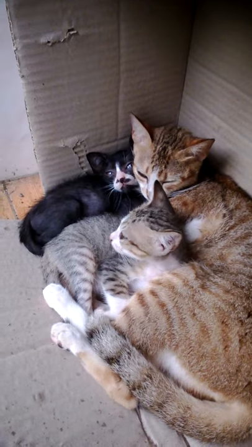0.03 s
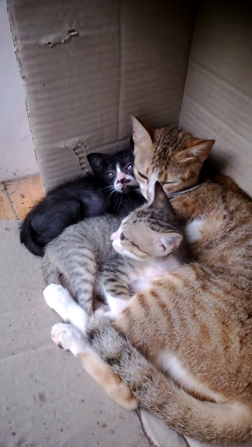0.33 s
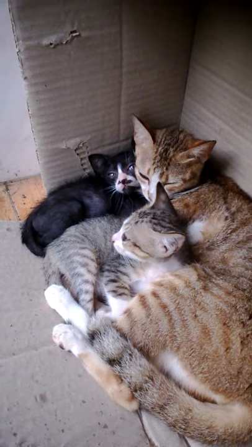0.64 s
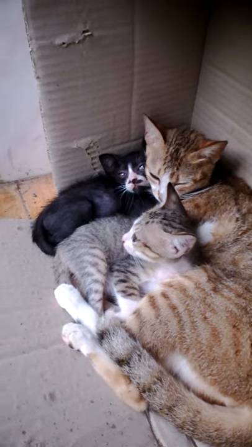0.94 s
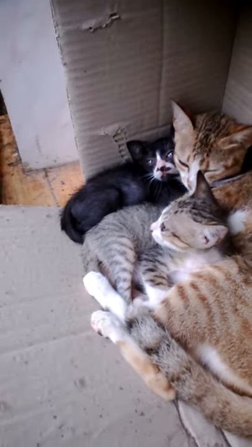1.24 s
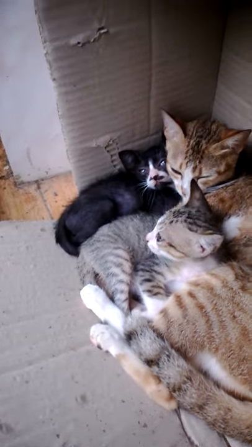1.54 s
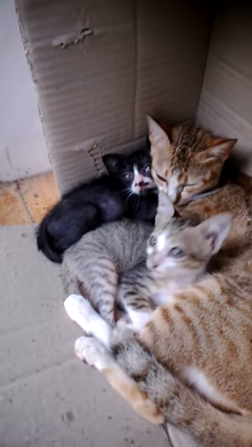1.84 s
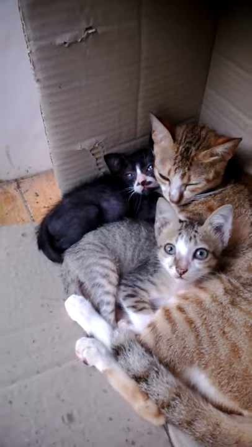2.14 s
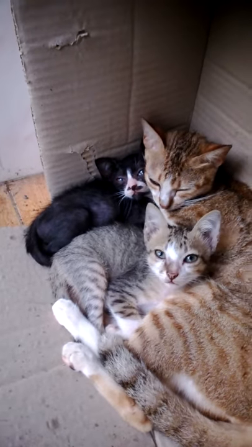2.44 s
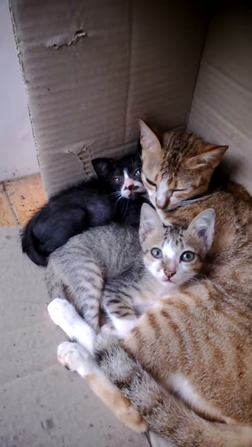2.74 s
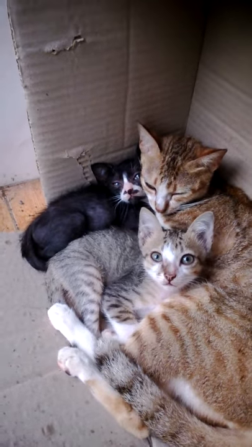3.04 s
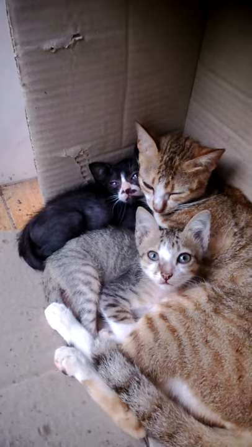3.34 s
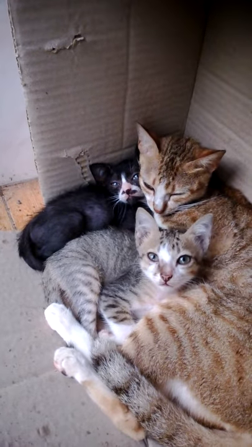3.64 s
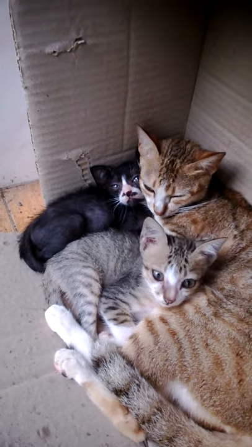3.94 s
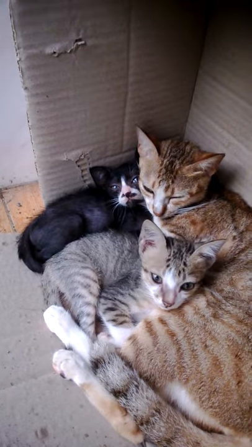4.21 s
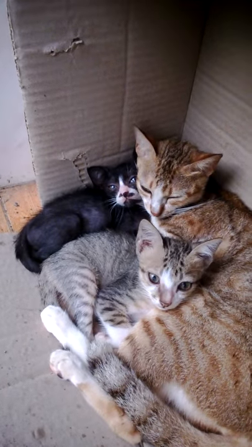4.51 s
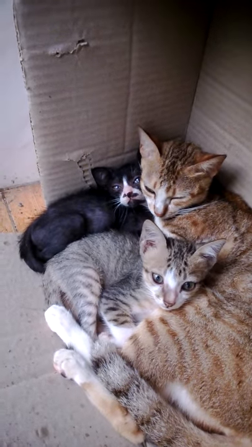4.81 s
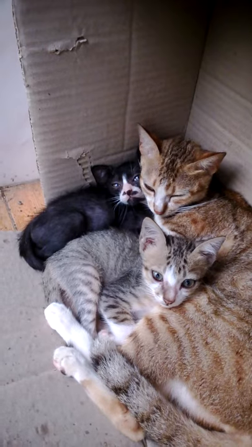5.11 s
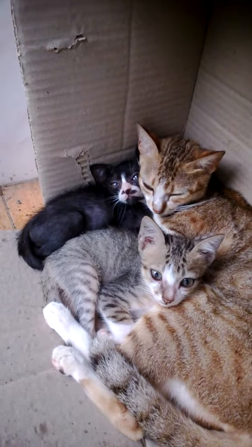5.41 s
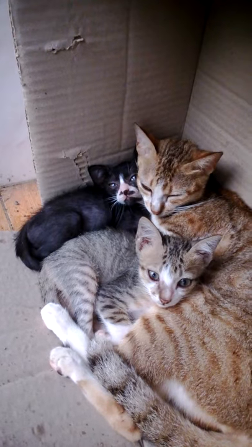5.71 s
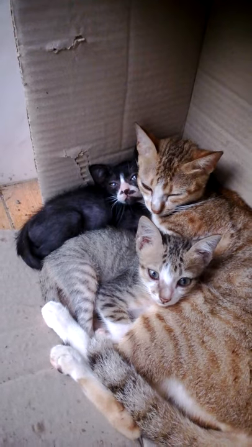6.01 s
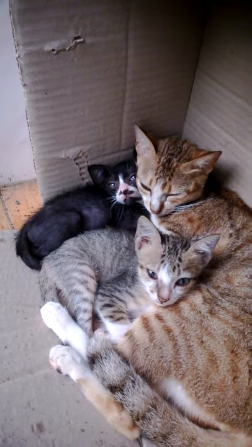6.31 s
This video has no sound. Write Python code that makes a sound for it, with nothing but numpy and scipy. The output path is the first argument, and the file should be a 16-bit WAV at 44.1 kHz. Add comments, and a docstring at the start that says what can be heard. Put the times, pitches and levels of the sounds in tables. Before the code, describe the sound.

Steady rain falls with a constant hiss and fine patter, heard from inside a home. Close drips tick and ring briefly off nearby walls, thickest at first, while small splashes of run-off and dull knocks of heavy drops come now and then. An engine idling outside adds a low, throbbing rumble. A faint far tone comes in short spells later, and a last burst of splashes lands near the end.

```python
"""Steady rain heard from inside a home, over the low rumble of an engine idling somewhere outside.
From the start, far drops merge into wash and hiss, nearer ones patter, and the nearest drips tick and
ring off close walls, thickest in the first two seconds. Run-off splashes and dull knocks of heavy drops
come now and then, the splashes bunching around 2.5-3 s. A faint far tone, glimpsed at the opening,
returns in spells from 4.4 s, and a last burst of run-off lands just after 6 s."""
import sys
import numpy as np
from scipy import signal
from scipy.fft import rfft, irfft
from scipy.io import wavfile
from scipy.ndimage import uniform_filter1d

SR = 44100
rng = np.random.default_rng(int(sys.argv[2]) if len(sys.argv) > 2 else 0)


def wrap_up_sound(samples):
    """Save the sound to the file named by the first command line argument, as 16-bit audio."""
    columns = np.atleast_2d(samples).T
    # keep every value between -1 and 1, then stretch to whole-number steps
    tamed = np.clip(columns, -1, 1)
    steps = np.round(tamed * 32767).astype(np.int16)
    wavfile.write(sys.argv[1], SR, steps)


N = 289396

# Fader ride of the rain on the ground. Each row: time in seconds, gain in dB.
RAIN_RIDE = [(0, 0.5), (1.1, 0.3), (2.2, -0.5), (2.55, 0.6), (3.2, 0.25), (4.05, -1), (4.45, -0.3),
             (5.3, -0.4), (6.3, -0.1), (6.56, 1.5)]
# Fader ride of the top hiss. Each row: time in seconds, level in dB before its boost.
TOP_HISS_RIDE = [(0, -64), (.07, -71), (.14, -76), (.24, -71), (.27, -74), (.46, -75), (.66, -76),
                 (.75, -59), (.89, -80), (1.15, -69), (1.33, -70), (1.44, -76), (1.5, -67), (1.68, -76),
                 (1.77, -63), (1.88, -77), (1.97, -63), (2.08, -71), (2.14, -66), (2.23, -83), (2.26, -66),
                 (2.32, -71), (2.5, -59), (2.56, -74), (2.65, -63), (2.7, -71), (2.83, -63), (2.9, -73),
                 (2.96, -65), (3.01, -76), (3.14, -66), (3.23, -75), (3.27, -60), (3.36, -70), (3.6, -66),
                 (3.76, -69), (3.84, -76), (4.02, -67), (4.05, -74), (4.11, -63), (4.29, -72), (4.33, -64),
                 (4.57, -65), (4.71, -76), (4.75, -71), (5.17, -66), (5.32, -76), (5.37, -64), (5.7, -69),
                 (5.72, -65), (5.75, -76), (5.94, -66), (6.01, -76), (6.1, -69), (6.17, -73), (6.23, -61),
                 (6.39, -68), (6.45, -63), (6.56, -68)]
# The nearest drips. Each row: start in seconds, ring peak in dB, pitch in Hz, ring decay in seconds,
# tick in dB relative to the ring.
DRIP_CUES = [(0.0927, -31, 2690, 0.0013, -12), (.198, -26.5, 2500, .004, -16),
             (.2285, -23, 2560, 0.0014, -7.5), (.3047, -36, 2620, .0015, -5),
             (.3332, -26.5, 2520, 0.0026, -10), (.462, -28.5, 2330, .0013, -8),
             (.555, -26.5, 2630, 0.0019, -11), (.5756, -36, 2460, .001, -1),
             (.6666, -27.5, 2460, .0035, -13), (0.6845, -27, 2580, .0041, -15),
             (0.7314, -32, 2360, .0022, -7), (.8127, -26, 2455, .003, -20), (.8245, -27, 2680, .002, -10),
             (0.8277, -28, 2600, .0026, -16), (0.956, -29.5, 2460, 0.0029, -18),
             (1.1153, -29, 2240, 0.0013, -13), (1.1195, -25.5, 2220, 0.002, -13),
             (1.23, -31, 2460, .0012, -5), (1.3311, -29, 2400, .0022, -8), (1.4483, -38, 2640, .001, -1),
             (1.692, -27, 2490, .002, -8), (1.761, -25.5, 2690, 0.0018, -14), (1.832, -31, 2050, .002, -10),
             (1.905, -28, 2320, .0026, -17), (2.355, -24.5, 2300, .002, -8),
             (2.679, -30.5, 2420, 0.0022, -14), (2.88, -33, 2220, .0014, -12),
             (3.077, -32, 2300, .0014, -14), (3.205, -31, 2110, 0.0011, -7), (3.32, -32, 2770, .003, -7),
             (3.353, -35, 2690, .0015, -12), (3.5126, -29.5, 2390, .0023, -12),
             (3.5681, -26, 2330, .0018, -11), (3.618, -30, 2250, .0014, -16),
             (3.655, -33.5, 2660, .003, -14), (3.838, -27, 2720, .0019, -12), (3.899, -30, 2310, .002, -10),
             (4.015, -40, 2240, .001, -6), (4.304, -33.5, 1880, .0018, -6), (4.392, -31, 2500, .0012, -12),
             (4.4507, -30, 2570, .0018, -4), (4.467, -27.5, 2180, .0015, -9),
             (4.486, -30, 2590, .0015, -14), (4.7248, -27.5, 2350, .002, -16),
             (4.915, -26, 2280, .0016, -9), (5.556, -24.5, 2330, 0.0017, -25),
             (5.684, -26, 2420, 0.0022, -22), (5.7432, -29.5, 2290, .0023, -17),
             (5.7475, -30, 2380, 0.002, -15), (5.7774, -24, 2740, 0.0024, -16),
             (5.9388, -30, 2320, .0018, -12), (6, -28, 2680, .0016, -8), (6.2106, -31, 1900, .0018, -16),
             (6.2222, -31, 2300, .002, -17), (6.233, -27, 2430, 0.0028, -18),
             (6.2513, -30, 2960, .0018, -10), (6.32, -29.5, 2120, .0015, -12),
             (6.491, -31, 2340, .0014, -5)]
# Pacing of the small drips. Each row: share fallen so far from 0 to 1, time in seconds.
DRIP_PACING = [(0, 0), (.35, 1.0), (.55, 2.2), (1, 6.56)]
# Run-off splashes. Each row: start in seconds, level in dB before the envelope, decay in seconds,
# centre in Hz, fizz in dB relative to the body.
SPLASH_CUES = [(0.334, -39, .026, 1130, -19), (.461, -38.5, 0.015, 1400, -19),
               (.682, -34, .0092, 1330, -16), (1.332, -41, .015, 1310, -20), (2.452, -44, .01, 1112, -1),
               (2.595, -39.5, .073, 1810, -21), (2.632, -39, 0.047, 1400, -20),
               (2.86, -40, 0.024, 1875, -20), (3.06, -41.5, 0.03, 1500, -19),
               (3.204, -43, 0.011, 2101, -17), (4.455, -46.5, .047, 784, -19),
               (4.491, -40, .026, 2200, -21), (4.914, -40.5, .019, 1500, -17),
               (5.961, -47.5, .072, 1100, -19), (6.21, -35.5, .08, 2000, -16), (6.249, -41, .02, 2700, -8),
               (6.29, -41.5, .045, 2090, -6.5)]
# Dull knocks of heavy drops. Each row: start in seconds, level in dB before the envelope.
KNOCK_CUES = [(0.682, -49.5), (1.62, -54.5), (2.112, -47), (2.18, -47), (2.66, -46), (2.87, -48.5),
              (3.58, -43), (3.771, -52), (4.281, -48.5), (4.439, -46), (4.551, -52), (4.89, -49),
              (5.01, -53), (5.459, -45.5), (5.68, -46), (5.999, -45.5), (6.102, -46.5)]
# Idle speed of the engine. Each row: time in seconds, shaft rate in Hz.
IDLE_SPEED = [(0, 18.8), (.9, 18.5), (2.4, 18.4), (3.3, 17.8), (4.6, 17.9), (6.56, 18.1)]
# The engine's harmonics. Each row: multiple of the shaft rate, relative level in dB.
ENGINE_ORDERS = [(2, -11.5), (3, -20), (4, -5.5), (5, -7), (6, -10), (7, -8.5), (8, -8.3), (11, -20.5)]
# Fader ride of the rumble. Each row: time in seconds, gain in dB.
RUMBLE_RIDE = [(0, -46), (.15, -48.5), (.24, -42), (.35, -47.5), (.54, -46), (.7, -45.5), (.8, -48.5),
               (.9, -45.5), (1.16, -43.5), (1.28, -54), (1.4, -45), (1.62, -44.5), (1.8, -51),
               (1.93, -44.5), (2.3, -48.5), (2.63, -44.5), (2.92, -50), (3.3, -48), (3.62, -45),
               (3.87, -51), (4.1, -47.5), (4.4, -48.5), (4.57, -43), (4.83, -53), (4.95, -47), (5.8, -49),
               (6.12, -43.5), (6.3, -47), (6.56, -47.5)]
# Deep throbs. Each row: start in seconds, length in seconds, level in dB before the trim, pitch in Hz.
THROB_CUES = [(0.01, 0.084, -41.5, 84), (0.206, 0.084, -43, 108.6), (.48, 0.074, -39, 80),
              (0.524, 0.062, -40, 79), (.645, .14, -39, 76), (0.837, 0.064, -38.5, 73.3),
              (1.009, 0.13, -42, 109), (1.119, 0.094, -41.5, 78), (1.474, 0.13, -41, 73),
              (1.673, 0.094, -39.5, 75.3), (1.888, .11, -43.5, 88), (2.105, 0.082, -42.6, 73.4),
              (2.18, 0.087, -45, 71), (2.44, 0.068, -43, 112), (2.521, .09, -44, 76.6),
              (3.065, 0.08, -37.5, 97), (3.139, 0.044, -37, 82.6), (3.191, .08, -38, 82),
              (3.56, .12, -44, 72), (4.045, 0.075, -40, 96), (4.121, .12, -38, 86.5),
              (4.254, .11, -40, 88.4), (4.513, .09, -40, 82), (4.58, .08, -42.5, 78),
              (4.66, 0.076, -41, 84), (4.868, 0.095, -42.5, 93), (4.979, 0.14, -37.5, 88),
              (5.133, 0.13, -42, 90), (5.928, 0.079, -42.2, 94), (6.014, 0.12, -40, 91),
              (6.08, .13, -37, 91)]
# Spells of the far tone. Each row: start in seconds, length in seconds, level in dB, pitch in Hz.
TONE_CUES = [(.15, .15, -57, 681), (.31, .13, -57, 666), (4.448, 0.092, -47.5, 691), (4.52, .14, -59, 691),
             (4.83, .15, -57, 692), (4.835, .13, -57, 633), (5.06, 0.16, -55.5, 692),
             (5.08, 0.31, -62, 668), (5.95, .17, -60, 636), (5.933, .18, -60.5, 710)]

# EQ curves, one for each layer. Each row: frequency in Hz, gain in dB.
WASH_EQ = [(120, -11), (200, -3.5), (300, -4.5), (400, -8), (475, -5.5), (570, -7.5), (690, -4),
           (790, -1.5), (1000, -4.5), (1220, 0.5), (1450, -2.5), (2000, 0), (2550, 6), (3300, -3),
           (4200, -11), (5200, -26)]
PATTER_EQ = [(500, -38), (1000, -19), (1800, -6.5), (2250, -4), (2560, -6.5), (2800, -6), (3200, -2),
             (4000, -15.5), (5000, -34), (7300, -15.5), (11000, -38), (15000, -46)]
HISS_EQ = [(3500, -28.5), (5000, -16), (5600, -11.5), (6500, -4), (7300, 1), (8300, -2.5), (10000, -10.5),
           (11500, -25), (13500, -31), (15500, -39)]
TOP_HISS_EQ = [(7000, -35), (9500, -7), (11000, -4), (13000, -15), (15500, -32)]
TICK_EQ = [(700, -15), (1300, -3), (2500, 1), (3400, 6.5), (4000, 0), (4500, -5.5), (5400, -32)]
KNOCK_EQ = [(120, -11), (200, -3.5), (280, -1), (360, -3), (470, -9), (800, -15.5)]
RUMBLE_EQ = [(20, -29), (30, -11), (45, -6.5), (60, -6.5), (75, 2), (90, -1.5), (120, -0.5), (146, -10.5),
             (170, -5), (230, -22.5)]


def rainfall(wash_db=-42, patter_db=-50.5, plink_db=-53):
    """The rain bed: far drops blur into a wash, nearer ones patter and plink, with hiss above."""
    far_drops = room(impacts(rate=2000, spread_db=1.5), wet_db=0.5, t60=0.14)
    wash = shimmer(colour(far_drops, WASH_EQ), depth_db=1.1, rate=28)
    near_drops = room(impacts(rate=170, spread_db=3.6), wet_db=-3, t60=0.09)
    patter = colour(near_drops, PATTER_EQ)
    treble = hiss() + top_hiss()
    flurry = undb(0.64 * walk(17))  # drops arrive in loose clusters
    ground = level(wash, wash_db) + level(patter, patter_db) + level(plinks(), plink_db)
    return flurry * (ground * undb(curves(RAIN_RIDE)[0]) + treble)


def shimmer(x, depth_db, rate, bands=5):
    """Drops land on changing spots, so each octave swells and fades by itself."""
    out = 0
    for edge_hz in 350 * 2 ** np.arange(bands):
        band = signal.sosfiltfilt(signal.butter(3, edge_hz, fs=SR, output="sos"), x)
        out = out + band * undb(depth_db * walk(rate))
        x = x - band
    return out


def plinks(count=420, centre_hz=2150, octaves=0.42, decay_cycles=14, spread_db=6.3, rise_s=0.0049):
    """Small drops trap bubbles in puddles; each rings briefly at its own rising pitch."""
    out, t = np.zeros(N), np.arange(SR // 25) / SR
    for when, pitch, size in rng.random((count, 3)):
        # small, high bubbles are the most common
        hz = centre_hz * 2 ** (octaves * max(1.3 + np.log(pitch), -2.5))
        ring = envelope(t, rise_s, decay_cycles / hz)
        gain = undb(spread_db * size ** 2) * hz / centre_hz
        add(out, when * N / SR, gain * ring * np.sin(2 * np.pi * hz * t * (1 + t)))
    return out


def hiss(hiss_db=-51, follow=0.12):
    """The finest drops merge into a grainy hiss that gently follows the fader of the top hiss."""
    smooth = rng.standard_normal(N)
    grain = room(impacts(rate=200, spread_db=-6.5), wet_db=12, t60=0.1)
    bed = colour(smooth + level(grain, -2.7), HISS_EQ)
    ride_db = curves(TOP_HISS_RIDE)[0]
    return level(bed, hiss_db) * undb(follow * (ride_db - ride_db.mean()))


def top_hiss(boost_db=3.5):
    """A faint, flickering high hiss around 10-14 kHz."""
    flicker = flutter(depth_db=2.5, rate=42)
    grain = room(impacts(rate=700, spread_db=2.0), wet_db=4, t60=0.04)
    return level(colour(grain, TOP_HISS_EQ), boost_db) * flicker * undb(curves(TOP_HISS_RIDE)[0])


def drips(count=80, small_db=-39.5, spread_db=2.5, small_hz=2570, scatter_hz=55, small_ring_s=0.0037):
    """The foreground drips, and smaller ones falling at random on the same surface."""
    out = np.zeros(N)
    for s, peak_db, hz, ring_s, tick_db in DRIP_CUES:
        add(out, s, drip(peak_db, hz, ring_s, tick_db))
    for k, (jitter, size, pitch) in enumerate(rng.uniform(-1, 1, (count, 3))):
        share = (k + 1 + jitter) / (count + 1)
        s = np.interp(share, *np.transpose(DRIP_PACING))
        add(out, s, drip(small_db + spread_db * size, small_hz + scatter_hz * pitch, small_ring_s))
    return out


def drip(peak_db, hz, ring_s, tick_db=-12, glide=0.013, echo_db=-4.5):
    """A drip ticks, rings for a few cycles at a slightly rising pitch, and the walls return it."""
    t = np.arange(SR // 12) / SR
    tick_s, echo_rise_s, echo_decay_s = 0.0028, 0.0025, 0.012
    ring = envelope(t, rise_s=0.0007, decay_s=ring_s)
    phase = 2 * np.pi * hz * (t + glide * t * (1 - np.exp(-t / ring_s)))
    tick = level(colour(rng.standard_normal(len(t)), TICK_EQ), tick_db) * np.exp(-t / tick_s)
    direct = undb(peak_db) * (ring / ring.max() * np.sin(phase) + tick)
    echo = resonate(rng.standard_normal(len(t)), hz, width_hz=380)
    echo *= (1 - np.exp(-t / echo_rise_s)) ** 2 * np.exp(-t / echo_decay_s)
    return direct + undb(echo_db) * echo * np.linalg.norm(direct) / np.linalg.norm(echo)


def splashes(rise_s=0.001, droplets_per_s=2500, body_top_hz=3800):
    """Run-off lands and breaks into a quickly fading shower of droplets; the finest of them fizz."""
    out, t = np.zeros(N), np.arange(SR // 3) / SR
    lowpass = signal.butter(4, body_top_hz, fs=SR, output="sos")
    for s, splash_db, decay_s, hz, fizz_db in SPLASH_CUES:
        droplets = rng.standard_normal(len(t)) * (rng.random(len(t)) < droplets_per_s / SR)
        body = level(signal.sosfilt(lowpass, resonate(droplets, hz, width_hz=hz)), splash_db)
        fizz = level(colour(droplets, HISS_EQ), splash_db + fizz_db)
        add(out, s, (body + fizz) * envelope(t, rise_s, decay_s))
    return out


def knocks(rise_s=0.00062, decay_s=0.06):
    """Heavy drops thud on something soft and boom briefly in the room."""
    out, t = np.zeros(N), np.arange(SR // 3) / SR
    for s, knock_db in KNOCK_CUES:
        thud = level(colour(rng.standard_normal(len(t)), KNOCK_EQ), knock_db)
        add(out, s, thud * envelope(t, rise_s, decay_s))
    return out


def rumble(noise_db=-2.5):
    """The low end: engine and outdoor noise boom in the room, swelling and fluttering together."""
    boom = engine() + level(colour(rng.standard_normal(N), RUMBLE_EQ), noise_db)
    return boom * flutter(depth_db=3.2, rate=44) * undb(curves(RUMBLE_RIDE)[0]) + throbs()


def engine(trim_db=-1.0, waver_db=3.0):
    """Only the low orders of the idling engine pass the walls; each wavers in strength."""
    out = np.zeros(N)
    turns = np.cumsum(curves(IDLE_SPEED)[0]) / SR
    for order, order_db in ENGINE_ORDERS:
        gain = np.sqrt(2) * undb(trim_db + order_db + waver_db * walk(7))
        out += gain * np.sin(2 * np.pi * (order * turns + rng.random()))
    return out


def throbs(trim_db=-0.5):
    """Deep pulses in the rumble: each swells and dies away within a few cycles."""
    out = np.zeros(N)
    for s, length_s, throb_db, hz in THROB_CUES:
        t = np.arange(int(length_s * SR)) / SR
        swell = np.sqrt(2) * undb(throb_db + trim_db) * np.hanning(len(t))
        add(out, s, swell * np.sin(2 * np.pi * (hz * t + rng.random())))
    return out


def far_tone(fade_s=0.029, waver=0.00698, blur=0.4):
    """A faint, unsteady tone from far off, heard in short spells and blurred by echoes."""
    out, t = np.zeros(N), np.arange(N) / SR
    wavering_time = np.cumsum(1 + waver * walk(30)) / SR
    for s, length_s, tone_db, hz in TONE_CUES:
        direct = np.sqrt(2) * np.sin(2 * np.pi * hz * wavering_time)
        echoes = level(resonate(rng.standard_normal(N), hz, width_hz=45), 0)
        gate = np.clip(np.minimum(t - s, s + length_s - t) / fade_s, 0, 1)
        out += undb(tone_db) * gate * (direct + blur * echoes)
    return out


def room(x, wet_db, t60):
    """The direct sound, then a fading tail of noise, so no two tails match."""
    decay = np.exp(-2 * np.log(1000) / (t60 * SR))
    energy = signal.lfilter([0, 1 - decay], [1, -decay], x ** 2)
    return x + undb(wet_db) * np.sqrt(energy) * rng.standard_normal(len(x))


def impacts(rate, spread_db):
    """Random clicks, `rate` a second; a few stand out, or sink back if the spread is negative."""
    chance, size, sign = rng.random(N), rng.exponential(size=N), rng.choice([-1, 1], N)
    return (chance < rate / SR) * sign * undb(spread_db * np.minimum(size, 2.5))


def colour(x, points, size=8192):
    """Minimum-phase EQ through (Hz, dB) points, so that clicks keep their sharp attack."""
    hz, db = np.transpose(points)
    bins = np.maximum(np.fft.rfftfreq(size, 1 / SR), 1)
    skirts = (np.minimum(bins / hz[0], 1) * np.minimum(hz[-1] / bins, 1)) ** 2
    response = skirts * undb(np.interp(np.log(bins), np.log(hz), db))
    cepstrum = irfft(np.log(response))
    cepstrum[1:size // 2] *= 2
    cepstrum[size // 2 + 1:] = 0
    return signal.oaconvolve(x, irfft(np.exp(rfft(cepstrum))))[:len(x)]


def resonate(x, hz, width_hz):
    """Two identical resonances in series, gain 1 at the centre."""
    peak = signal.iirpeak(hz, hz / width_hz, fs=SR)
    return signal.lfilter(*peak, signal.lfilter(*peak, x))


def envelope(t, rise_s, decay_s):
    """A percussive shape: quick attack, exponential tail."""
    return (1 - np.exp(-t / rise_s)) * np.exp(-t / decay_s)


def flutter(depth_db, rate):
    """A random, soft-limited tremolo gain with an rms of 1."""
    return level(undb(depth_db * np.tanh(1.3 * walk(rate))), 0)


def walk(rate):
    """Smooth random modulation: values held 1 / rate seconds and slewed twice."""
    hold = int(SR / rate)
    steps = np.repeat(rng.standard_normal(N // hold + 1), hold)[:N]
    return level(uniform_filter1d(uniform_filter1d(steps, hold), hold), 0)


def curves(table):
    """Automation lanes: each value column joined by straight lines in time."""
    s, *columns = np.transpose(table)
    return [np.interp(np.arange(N) / SR, s, column) for column in columns]


def add(track, s, sound):
    """Mix a sound in at s seconds."""
    start = max(int(s * SR), 0)
    track[start:start + len(sound)] += sound[:N - start]


def level(x, db):
    """Scale to an rms level."""
    return x * undb(db) / np.sqrt(np.mean(x ** 2))


def undb(db):
    """Decibels to gain."""
    return 10 ** (np.asarray(db) / 20)


def scene():
    """The mono mix: rain in front, rumble and far tone behind."""
    return (rainfall() + drips() + splashes() + knocks() + rumble() + far_tone())[None]


def record(dry):
    """A steep high cut at 15.6 kHz takes the very top off the mix."""
    return signal.sosfilt(signal.ellip(10, 0.2, 70, 15600, fs=SR, output="sos"), dry)


dry = scene()
out = record(dry)
wrap_up_sound(out)
```